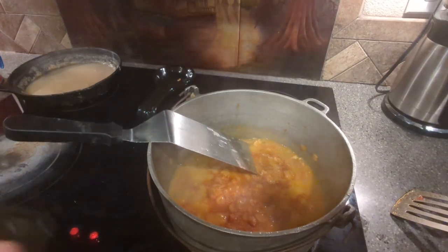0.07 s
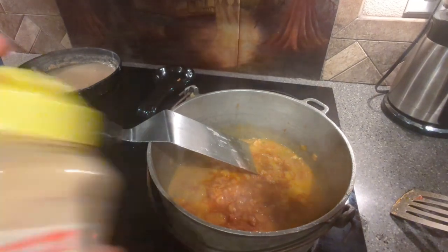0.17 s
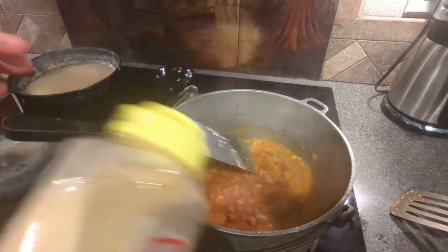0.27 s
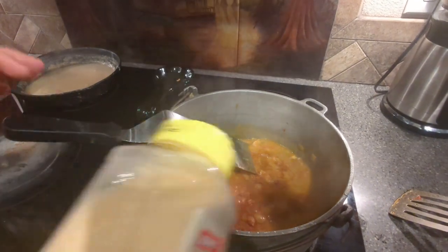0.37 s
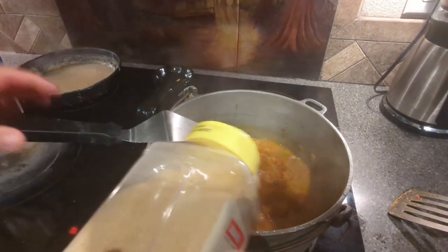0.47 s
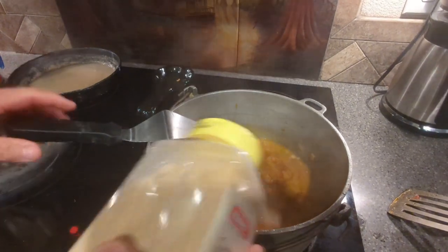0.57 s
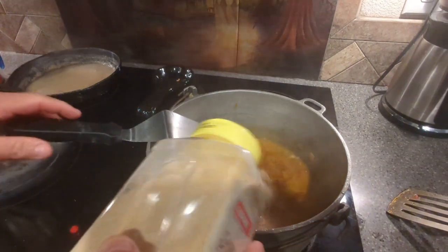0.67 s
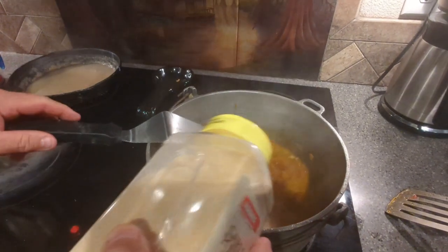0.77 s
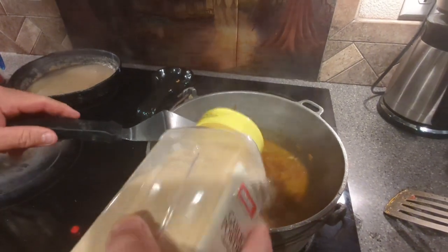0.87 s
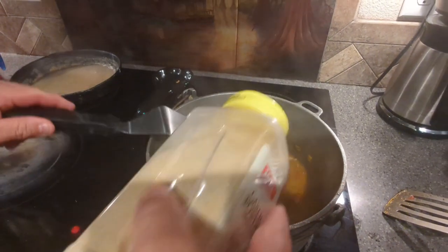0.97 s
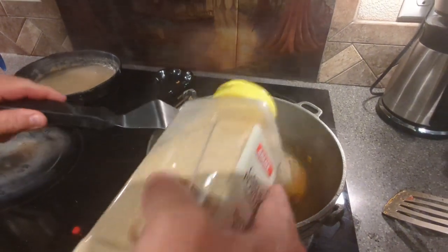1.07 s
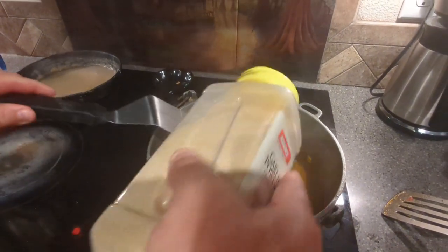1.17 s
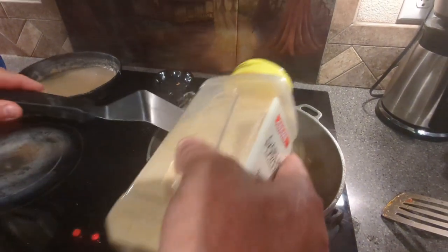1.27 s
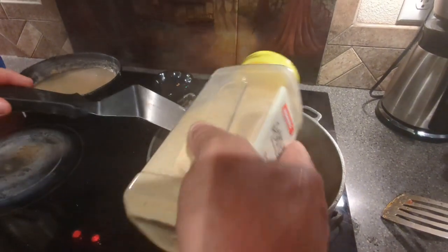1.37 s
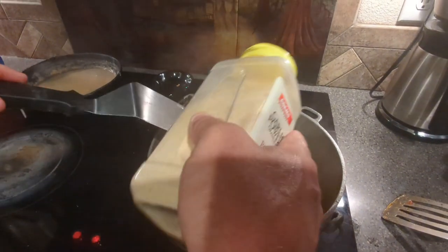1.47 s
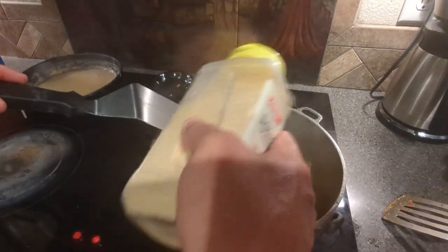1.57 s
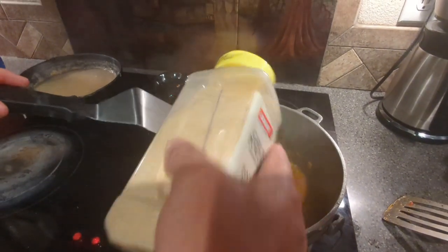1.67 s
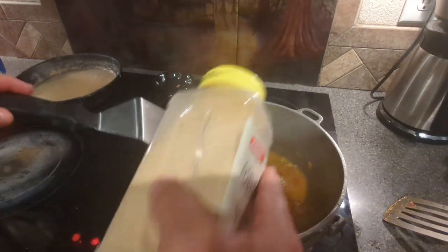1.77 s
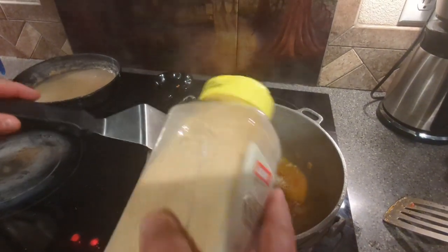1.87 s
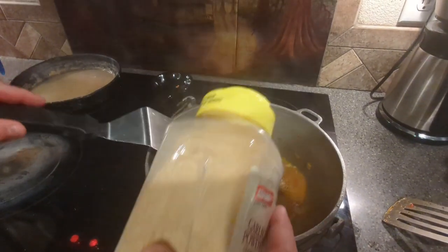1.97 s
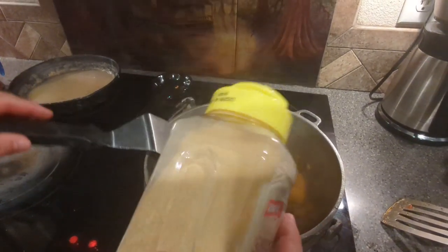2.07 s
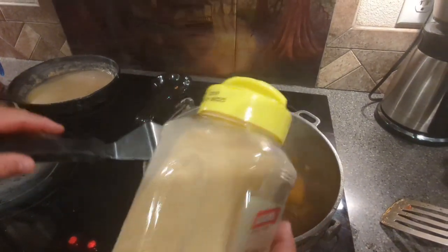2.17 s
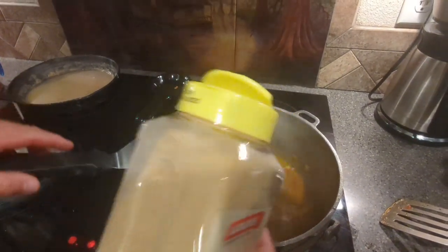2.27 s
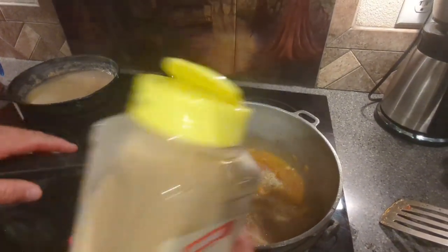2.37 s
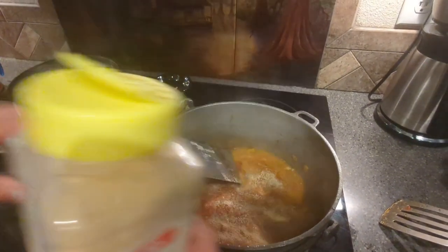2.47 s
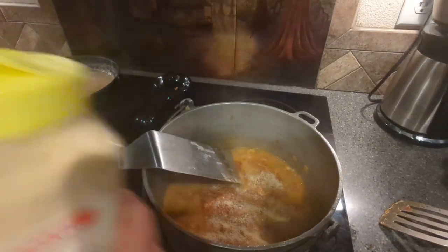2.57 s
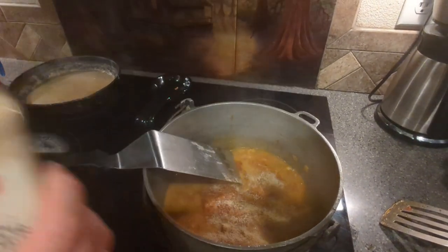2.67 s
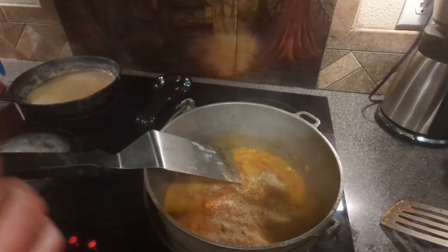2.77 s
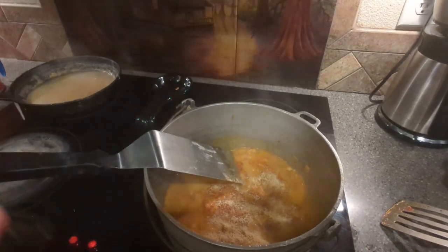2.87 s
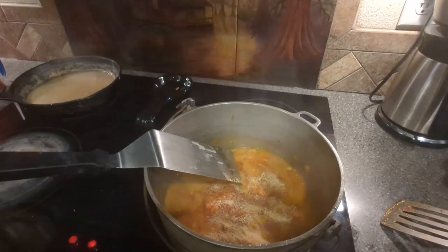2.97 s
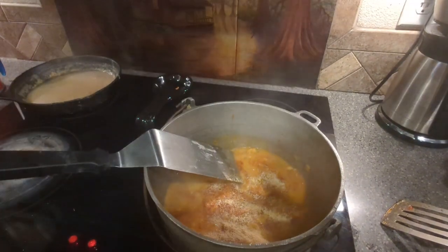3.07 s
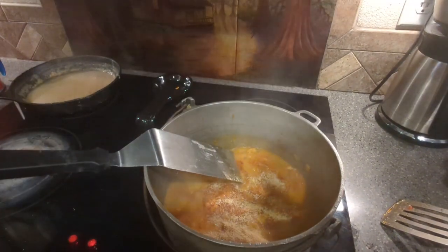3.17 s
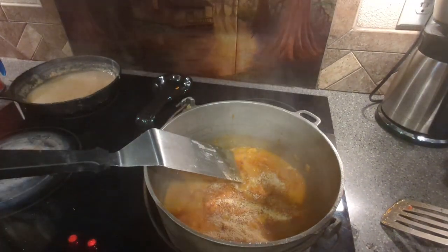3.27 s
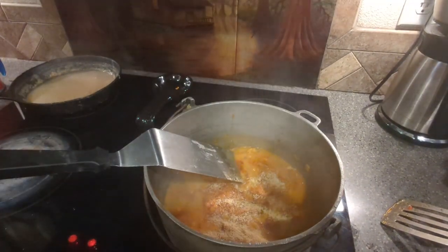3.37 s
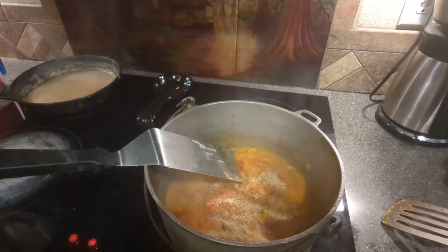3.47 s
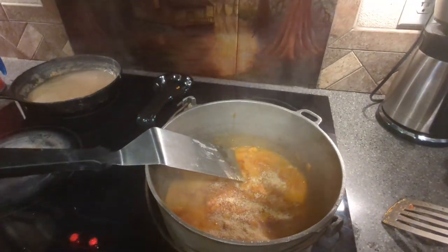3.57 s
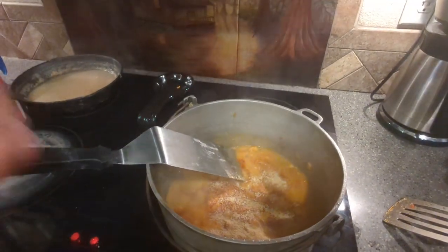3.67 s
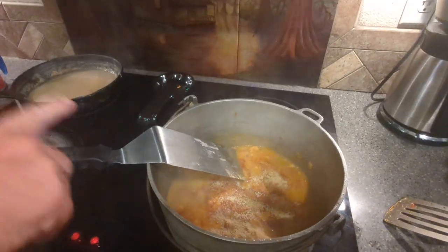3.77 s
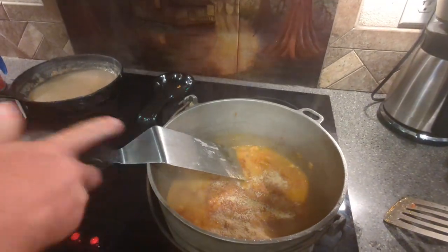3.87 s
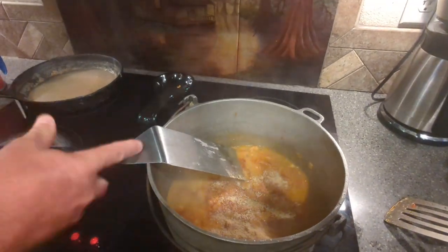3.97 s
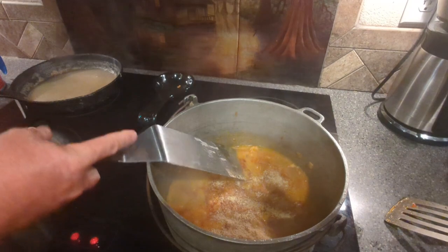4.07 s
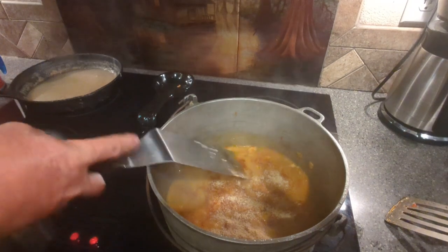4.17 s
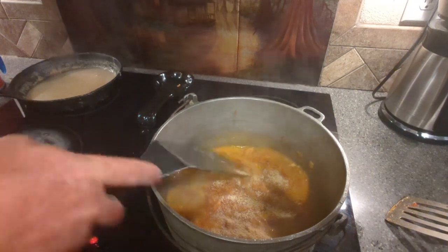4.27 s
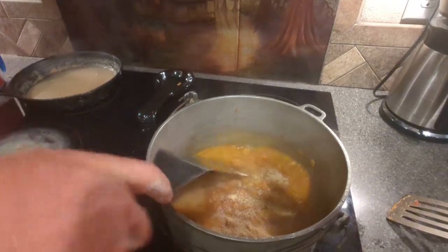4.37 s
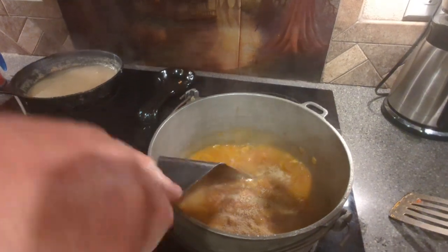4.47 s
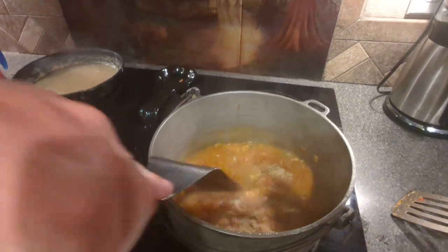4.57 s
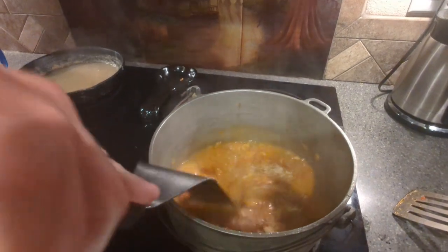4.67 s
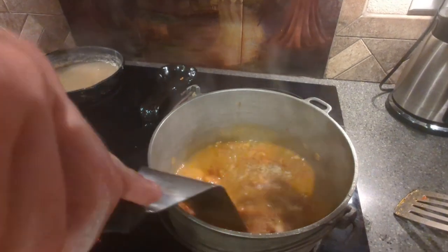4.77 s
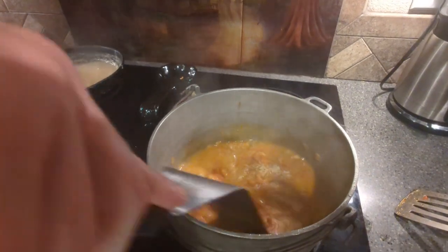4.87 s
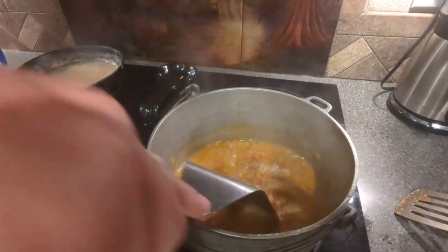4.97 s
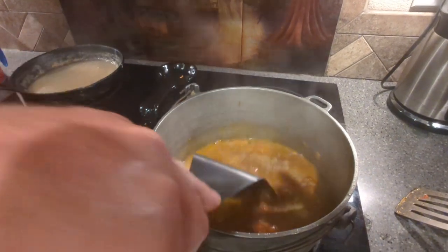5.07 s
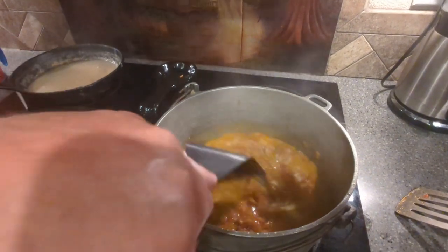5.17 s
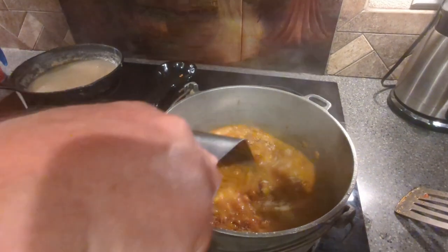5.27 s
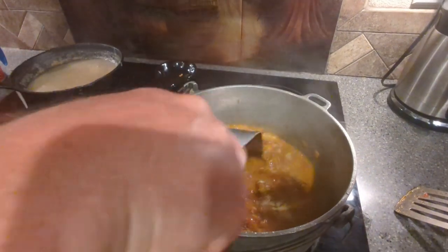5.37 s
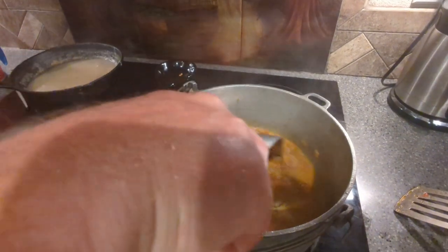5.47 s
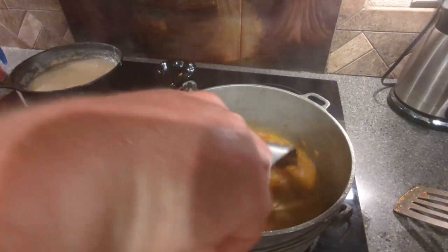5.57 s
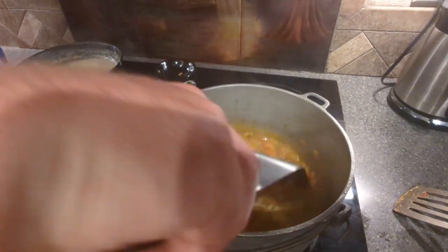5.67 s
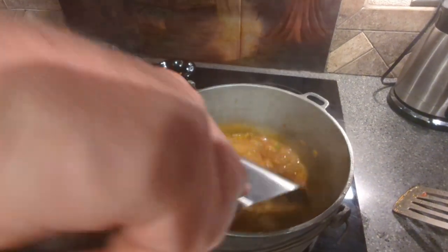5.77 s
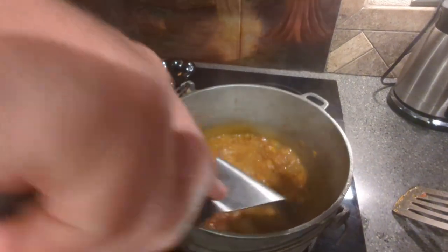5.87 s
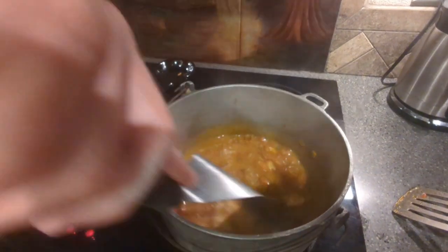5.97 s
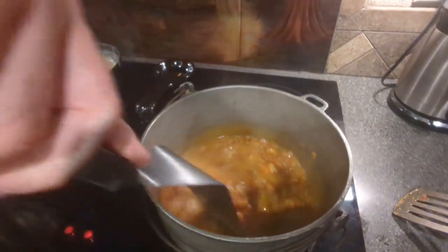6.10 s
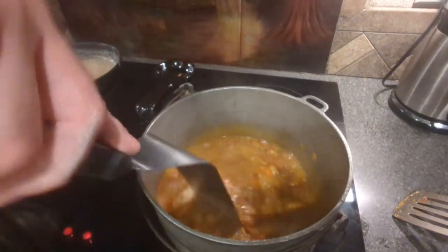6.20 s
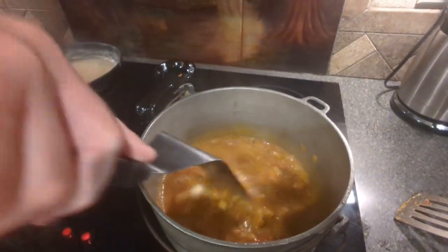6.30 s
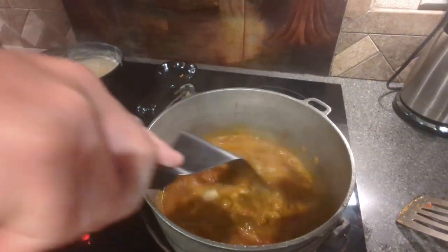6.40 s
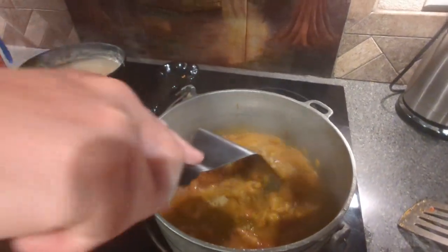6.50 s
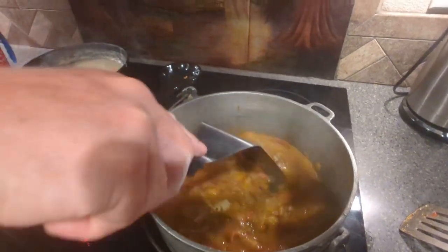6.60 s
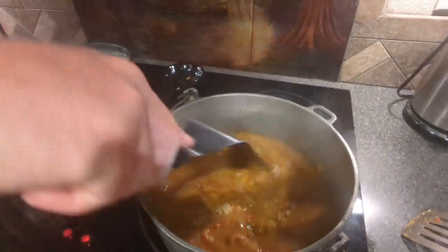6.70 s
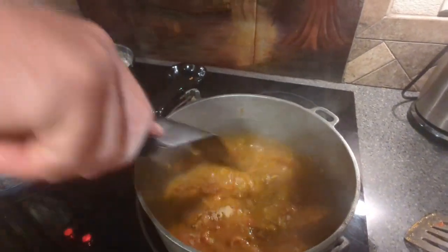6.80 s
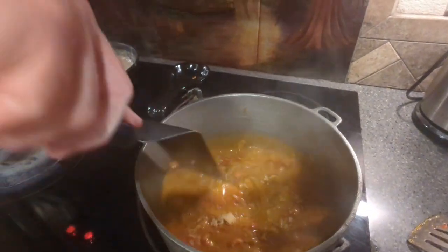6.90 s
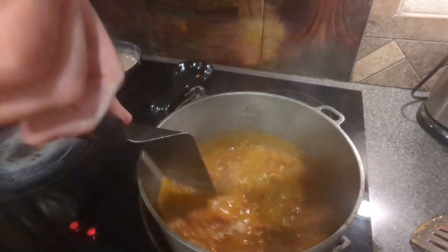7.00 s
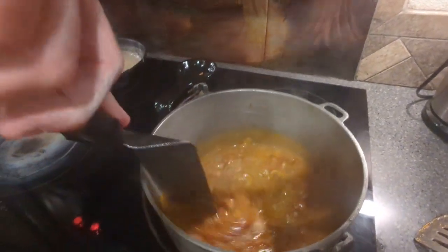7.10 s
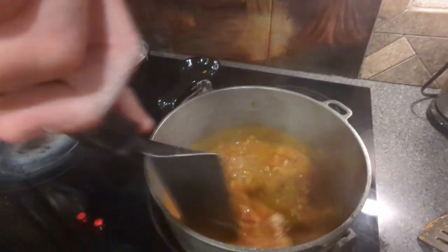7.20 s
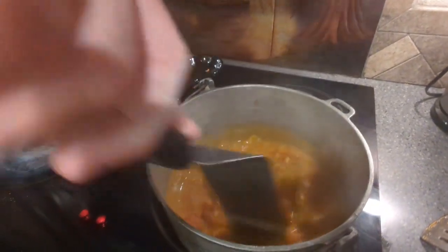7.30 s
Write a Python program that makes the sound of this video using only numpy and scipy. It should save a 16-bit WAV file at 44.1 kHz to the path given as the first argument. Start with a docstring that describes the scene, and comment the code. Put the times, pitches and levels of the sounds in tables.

```python
"""Spatula and spice at the pot

In a kitchen, close to the microphone, a steel spatula rubs and knocks on the rim of an aluminium pot while
spice is shaken in; a plastic lid snaps shut, then the blade scrapes and squeaks on the pot floor under thick
sauce and once chatters. A slow motor drones behind the kitchen hush. Noise slips and blows ring damped modes
for the metal and the lid, filtered noise makes the rustle and air, and wavering sines the squeaks and motor."""
import sys
import numpy as np
from scipy import signal
from scipy.fft import rfft, irfft, next_fast_len
from scipy.io import wavfile
from scipy.ndimage import uniform_filter1d

SR = 44100
rng = np.random.default_rng(int(sys.argv[2]) if len(sys.argv) > 2 else 0)


def inscribe(sig):
    """Save sig as 16-bit PCM at rate SR to the path in sys.argv[1].

    A 1-D sig is mono; a 2-D sig holds one channel per row.
    Samples are clipped to [-1, 1] before scaling.
    """
    pcm = np.round(np.clip(np.atleast_2d(sig).T, -1, 1) * 32767)
    wavfile.write(sys.argv[1], SR, pcm.astype(np.int16))


N = 323694
T = np.arange(N) / SR
EARS = np.array([[.5], [-.5]])  # left, right: half of any difference goes to each


def amp(db):
    """Amplitude factor of a level in dB."""
    return 10 ** (np.asarray(db) / 20)


def unit(x):
    """Scale to an rms of 1."""
    return x / np.sqrt(np.mean(x ** 2))


def peak(x, db):
    """Set the peak of the two-ear mean 3 dB below the given level."""
    return x * amp(db) / np.abs(x.mean(axis=0)).max() / np.sqrt(2)


def along(table, hz):
    """Read a (f/Hz, value) table on a log axis."""
    table_hz, values = np.array(table).T
    return np.interp(np.log(hz + 1), np.log(table_hz + 1), values)


def colour(x, table, share=0.97):
    """Filter by a share of the dB values of a (f/Hz, level/dB) table."""
    n = x.shape[-1]
    hz = np.arange(n // 2 + 1) * SR / n
    return irfft(rfft(x) * amp(share * along(table, hz)), n)


def band(x, lo_hz, hi_hz):
    """Keep the sound between two frequencies."""
    return signal.sosfilt(signal.butter(2, [lo_hz, hi_hz], "band", fs=SR, output="sos"), x)


def walk(rate, size=N):
    """Random levels held 1 / rate s and slewed; spread near 1."""
    step = (np.arange(size) * rate / SR).astype(int)
    held = rng.standard_normal(size // 100)[step]
    return 1.187 * uniform_filter1d(held, int(SR / rate))


def ring(x, modes, gains_db, widen=0.76, alike_hz=970.0, blur_hz=0.):
    """Damped modes, each with its own phase shift between the ears; a wandering phase smears the line."""
    out = 0
    for (hz, width, db), gain_db in zip(modes, gains_db):
        pole = np.exp((2j * hz - width * widen) * np.pi / SR)
        z = signal.lfilter([1 - abs(pole)], [1, -pole], x) * amp(db + gain_db)
        drift = np.cumsum(rng.standard_normal(len(x)) * np.sqrt(2 * np.pi * np.abs(blur_hz) / SR))
        # short waves differ more between the ears
        spread = np.pi * min(hz / alike_hz, 1)
        shift = EARS * spread * rng.choice([-1, 1]) * rng.uniform(0.15, 0.77)
        out = out + (z * np.exp(1j * uniform_filter1d(drift, size=64)) * np.exp(1j * shift)).imag
    return out


def favour(modes, hz, db, octaves):
    """Modes near the given pitch are driven harder."""
    return [db * np.exp(-(np.log2(m[0] / hz) / octaves) ** 2) for m in modes]


def burst(t60, lo_hz, hi_hz, size=9000):
    """A crack of noise that builds within a moment and dies away."""
    t = T[:size]
    onset = 1 - np.exp(-t / 0.00084)
    decay = np.exp(-np.log(1000) * t / t60)
    return band(rng.standard_normal((2, size)) * onset * decay, lo_hz, hi_hz)


def add(out, s, x):
    """Mix x in from time s, cut at the end."""
    i = int(s * SR)
    out[:, i:i + x.shape[1]] += x[:, :N - i]


# level lost over one rise or fall time; how round the flanks are
EDGE_DB, EDGE_SHAPE = -20.5, 1.01


def swells(rows, t):
    """One envelope in dB per row: rise, hold, fall."""
    s, rise, hold, fall = (rows[:, k, None] for k in range(4))
    before = np.maximum((s - t) / np.maximum(rise, .003), 0)
    after = np.maximum((t - s - hold) / np.maximum(fall, .003), 0)
    return EDGE_DB * np.minimum(before + after, 8) ** EDGE_SHAPE


def total(swell_db, level_db):
    """Overlapping events add in power."""
    return np.sqrt(amp(2 * (swell_db + level_db[:, None])).sum(axis=0))


# spectrum of room air and simmer: f/Hz, relative density level/dB
HUSH = [(30, -13), (45, -6.5), (65, 5), (110, -6), (150, -13), (200, -6), (300, -11.5), (750, -26),
        (1700, -30), (5000, -42.5), (9000, -46), (10000, -53.5), (13000, -44), (16000, -54)]
HUSH_DB = -45  # rms


def hush():
    """Room air and simmer: coloured noise, more alike at the two ears in the bass."""
    mid, side = colour(rng.standard_normal((2, N)), HUSH)
    side = colour(side, [(60, -23), (130, -7.5), (290, -12.5), (640, -1.0), (1400, 1.0)])  # f/Hz, level/dB
    return amp(HUSH_DB) * unit(mid + 2 * EARS * side)


SHAFT_HZ = 12.405
# lines of the slow motor: multiple of the shaft rate, mean rms level/dB
DRONE = [(4, -74), (5, -57), (7, -58), (8, -48.5), (9, -41), (10, -48), (11, -59.5), (12, -58.5), (13, -85),
         (15, -52)]


def drone():
    """Multiples of the motor's shaft rate, each wavering a little in level and phase."""
    out = 0
    for multiple, db in DRONE:
        level = amp(db + 0.63 * walk(3.19)) * np.sqrt(2)
        turns = multiple * SHAFT_HZ * T + rng.random() + 0.013 * walk(2.53)
        out = out + level * np.sin(2 * np.pi * turns)
    return out


# spectrum of fine friction: f/Hz, relative density level/dB
HISS = [(880, -43), (1500, -4), (1790, -5.5), (1980, 2), (2410, -8), (2610, 3), (2940, -7.5), (4080, -6.5),
        (4640, -9), (8000, -7.5), (10100, -14), (14300, -6.5), (16000, -17)]


def hiss(surge_db, size=N):
    """Fine friction noise, unrelated at the two ears."""
    noise = colour(rng.standard_normal((2, next_fast_len(size))), HISS)
    return unit(noise)[:, :size] * amp(surge_db * walk(39.86, size=size))


# rustles of hands, jar and sleeves; the row at 3.129 s is the tail of the lid's snap:
# t/s at full level, rise/s, hold/s, fall/s, level/dB;
# dull part and thin top, level/dB re the rustle; left minus right, level/dB
RUSTLE = [(0.0, 0.023, 0.0089, 0.19, -57, 12.5, 8, 0), (0.1, 0.098, 0.021, 0.018, -64, -2, 12, 9),
          (0.182, 0.019, 0.0044, 0.023, -45.5, -10, 5.5, 4), (0.25, 0.06, .15, .1, -61, -5, -5, 0),
          (0.448, 0.0095, 0.00042, 0.047, -57, 5, -13, -3), (0.59, 0.26, .01, .03, -63, 3, -7, -3),
          (0.636, 0.0094, .002, 0.023, -59.5, 11, -5, -2), (0.88, 0.57, .03, .05, -60.5, 1.5, -8, -4),
          (2.4, .05, 0.024, 0.51, -64, 7, 5, 1), (2.588, .03, .002, 0.019, -63, 1, -9, 1),
          (2.695, 0.12, 0.0057, 0.032, -69.5, 6, 10.5, 12), (2.773, 0.014, .002, 0.035, -68, 13, 6.5, -6),
          (2.925, 0.083, 0.043, 0.18, -48.5, -6, 5, 5), (3.129, 0.033, 0.0061, 0.052, -44.5, 11, 6, 0),
          (3.17, .04, 0.023, 0.32, -51.5, 6.5, -12, -1.5), (3.335, 0.1, 0.0042, 0.052, -51.5, -11, 9.5, 5),
          (3.5, 0.42, .005, 0.065, -58.5, -6, 4.5, 3), (3.725, 0.34, .005, .15, -60, -1, -7, 2),
          (3.857, .008, .002, 0.024, -57, 2, -17, 1), (3.921, .008, .002, 0.056, -52, -8, -19, -2)]


def rustle():
    """Hands, jar and sleeves, and the tail of the lid's snap: swells of fine hiss, a dull part and a thin top."""
    rows, slow = np.array(RUSTLE), T[::32]
    db, dull_db, thin_db, pan_db = rows[:, 4:].T
    swell = swells(rows, slow)

    def gain(part_db):
        """Level of one part at each ear."""
        return np.array([np.interp(T, slow, total(swell, db + part_db + ear * pan_db)) for ear in EARS])

    fine = hiss(4.6)
    dull = unit(band(rng.standard_normal((2, N)), 900, 3000)) * amp(2.5 * walk(40))
    thin = unit(band(fine, 7760, 15700))
    return gain(0) * unit(band(fine, 3660, 9900)) + gain(dull_db) * dull + gain(thin_db) * thin


# faint ticks: t/s, level/dB as in peak(), f/Hz, left minus right level/dB
TICKS = [(0.219, -43, 1920, -7), (0.2802, -36, 1060, -7), (0.546, -45, 1990, -6), (0.571, -44.5, 2150, -5),
         (0.8589, -45.5, 1850, -11), (2.828, -40.5, 1900, -1), (2.8818, -35.5, 1920, -3),
         (3.492, -44, 1760, -11), (3.8127, -51, 1730, -7)]


def ticks():
    """Faint ticks: short bursts of noise in a narrow band around each pitch."""
    out = np.zeros((2, N))
    for s, db, hz, pan_db in TICKS:
        add(out, s, amp(EARS * pan_db) * peak(burst(0.017, hz * 0.89, hz * 1.31), db))
    return out


# share of the pressure swing, in dB, that each layer follows
BOOM_FOLLOWS, UPPER_FOLLOWS, HISS_FOLLOWS = 0.8, 1, 0.73


def grit(spread_db, surge_db, size):
    """Dense micro-slips of uneven but bounded size that come in quick surges."""
    uneven_db = spread_db * np.minimum(rng.exponential(size=size), 4.0)
    return rng.standard_normal(size) * amp(uneven_db + surge_db * walk(70, size=size))


def driven(slips, modes, gains_db, roam_db, blur_hz):
    """A group of modes at even loudness; the contact point wanders, so each is driven now more, now less."""
    gains_db = [g + roam_db * walk(14, size=len(slips)) for g in gains_db]
    power = sum(m[1] * amp(2 * (m[2] + g)) for m, g in zip(modes, gains_db))
    rings = ring(slips, modes, gains_db, blur_hz=blur_hz)
    rings = band(rings, 0.91 * modes[0][0], 1.47 * modes[-1][0])
    return unit(rings / np.sqrt(power))


def friction(table, blur, low, modes, grit_db, surge_db, roam_db, focus_db, octaves, thrum_db, treble_db):
    """Slips drive groups of modes and shake the hob; where the edge bears decides their shares."""
    rows = np.array(table)
    span = slice(int((rows[0, 0] - .2) * SR), int((rows[-1, 0] + .3) * SR))
    press = swells(rows, T[span])
    db, boom_db, second_db, upper_db, hiss_db = rows[:, 4:9].T
    # the strongest stroke sets the place
    weight = amp(2 * (press + db[:, None]))
    boom_hz, ring_hz, upper_hz = rows[:, 9:].T @ weight / weight.sum(axis=0)
    size = press.shape[1]
    blur_hz = np.interp(T[span], *np.array(blur).T)
    slips = grit(grit_db, surge_db, size=size)
    edges_hz = [(0, 1300), (1300, 1800), (1800, 4100), (4100, 10000)]
    mid, second, upper, high = ([m for m in modes if a < m[0] < b] for a, b in edges_hz)
    boom = driven(slips, low, favour(low, boom_hz, focus_db, 1.4 * octaves), roam_db, 0.3 * blur_hz)
    main = driven(slips, mid, favour(mid, ring_hz, focus_db, 0.52 * octaves), roam_db, blur_hz)
    over = driven(slips, second, [0] * len(second), roam_db, blur_hz)
    top = driven(slips, upper, favour(upper, upper_hz, focus_db, octaves), roam_db, 1.55 * blur_hz)
    # narrow high resonances, mixed into the hiss
    treble = driven(slips, high, [0] * len(high), 3.4 * roam_db, 1.3 * blur_hz)
    thrum = unit(band(slips, 138.3, 158))  # the hob
    low_part = boom + amp(thrum_db) * thrum
    hiss_part = hiss(2.13, size=size) + amp(treble_db) * treble
    out = np.zeros((2, N))
    out[:, span] = (total(press, db) * main
                    + total(UPPER_FOLLOWS * press, db + second_db) * over
                    + total(UPPER_FOLLOWS * press, db + upper_db) * top
                    + total(BOOM_FOLLOWS * press, db + boom_db) * low_part
                    + total(HISS_FOLLOWS * press, db + hiss_db) * hiss_part)
    return out


# strokes on the bare rim: t/s at full pressure, rise/s, hold/s, fall/s, ring level/dB;
# low boom, second ring, upper modes, hiss, level/dB re ring; favoured boom, ring, upper mode, f/Hz
RUB = [(0.93, 0.058, 0.073, 0.054, -51, 0.5, -7, -0.5, -12, 276, 1125, 2700),
       (1.045, 0.13, 0.056, 0.023, -43, -7, -8, -3.5, -2.5, 274, 1150, 3260),
       (1.11, 0.023, 0.0084, 0.041, -45.5, -5, -14, 6.5, -6, 240, 970, 3200),
       (1.189, 0.068, 0.0045, 0.082, -46, -11, -3.5, -3, -9.5, 292, 1160, 3150),
       (1.31, 0.011, 0.028, .03, -47, -20, 0, 1, -6, 260, 990, 2670),
       (1.365, 0.045, 0.052, 0.065, -34, -18.5, -8.5, -7, -11, 308, 1000, 2600),
       (1.43, .03, 0.031, 0.18, -47.5, -14, -6, -3, -8, 322, 1050, 2230),
       (1.655, 0.023, 0.063, 0.055, -42, -22, -13, -5.5, -8, 363, 1017, 2160),
       (1.72, 0.062, 0.03, 0.039, -40, -16, -8, -8, -7, 366, 1014, 2630),
       (1.78, 0.039, 0.021, 0.068, -28, -17, -8.5, -3, -7, 413, 980, 1920),
       (1.82, 0.05, 0.011, 0.15, -29, -16, -6.5, -4, -5.5, 424, 1100, 2140),
       (1.93, 0.038, 0.078, 0.19, -48.5, 4, -4, -1, -11, 420, 1010, 2330),
       (2.067, 0.16, 0.059, 0.19, -44.5, -8, -20, -8.5, -9, 537, 1140, 2510),
       (2.13, 0.08, 0.04, 0.1, -38.5, -6, -4.5, -12, -11, 490, 935, 2260),
       (2.2, 0.074, 0.045, 0.076, -37, -10, -4, -6, -9, 480, 930, 2110),
       (2.27, 0.048, 0.062, 0.043, -38, 0, -7, -2, -5, 275, 925, 2140)]
# smear of the lines as the blade wobbles, before each group's factor: t/s, f/Hz
RIM_BLUR = [(.9, 6), (1.25, 5.5), (1.35, 2), (1.6, 2.2), (1.88, 7.9), (1.95, 54), (2.4, 51)]
# modes of the side wall, then of the bare rim: f/Hz, width/Hz before the damping factor, level/dB
WALL_MODES = [(280.7, 24, -8), (328, 28, -6), (390, 13, -5), (475, 40, -8.5), (554, 61, -10.5)]
RIM_MODES = [(745.4, 7.6, 1), (927, 28, -11), (962, 23, -4.5), (999, 20, -1), (1090, 59, -3), (1128, 13, 0),
             (1233, 30, -7.5), (1487, 16, -8), (1539, 106, -4.5), (1680, 68, -14), (1910, 53, -3),
             (2110, 25, -14), (2248, 16, 3), (2647, 15, -1), (3000, 40, -10), (3217, 29, 0),
             (3430, 28, -8.5), (3624, 60, -4), (3700, 51, -13), (4000, 25, -13), (4240, 66, -6),
             (4370, 41, -13), (4800, 49, -16), (5150, 27, -1), (5600, 30, -18), (6100, 33, -3),
             (6400, 85, -4), (6800, 40, -5), (7420, 60, -9), (8000, 60, -8), (8500, 100, -8),
             (9300, 50, -8)]


def rub():
    """The dry rim rings in narrow lines."""
    return friction(RUB, RIM_BLUR, WALL_MODES, RIM_MODES, grit_db=1.5, surge_db=1.65, roam_db=1.36,
                    focus_db=9.2, octaves=0.079, thrum_db=-4, treble_db=-6.0)


# the blade locks onto one mode and sings: t/s at full level, rise/s, hold/s, fall/s, rms level/dB, f/Hz
SQUEAKS = [(0.95, .04, .06, .06, -60, 2653), (1.05, .05, 0.033, .05, -48, 3400),
           (1.2, .03, .015, .04, -56, 3400), (1.37, .03, .03, .05, -49, 2644),
           (1.375, .03, 0.018, 0.042, -37, 985), (1.43, .025, 0.035, .11, -44, 2263),
           (1.772, .03, 0.022, .05, -42, 1918), (1.79, 0.043, 0.046, .03, -46, 5125),
           (1.798, .05, 0.033, .04, -35, 992), (4.645, .015, 0.033, .03, -42.5, 1142),
           (5.227, .02, .012, .04, -38, 2430), (5.65, .04, .03, .04, -36.5, 1170),
           (6.49, .04, 0.029, 0.035, -40, 2400), (6.795, .03, .04, .06, -36, 1090),
           (6.86, 0.051, 0.048, .08, -36.5, 1008)]


def squeaks(waver=0.29, flutter_db=1.5):
    """Near-steady tones that waver a little, each with its own phase shift between the ears."""
    out = np.zeros((2, N))
    t = T[:22050]
    for row in SQUEAKS:
        start, db, hz = row[0] - .15, row[4], row[5]
        wander = waver * np.pi * walk(44.5, size=len(t))
        phase = 2 * np.pi * hz * t + wander + EARS * rng.uniform(-2.5, 2)
        level_db = swells(np.array([row]), start + t) + db + flutter_db * walk(55, size=len(t))
        add(out, start, np.sqrt(2) * amp(level_db) * np.sin(phase))
    return out


# spatula on pot: t/s, ring level/dB and crack level/dB as in peak(), brightness/dB per octave
KNOCKS = [(1.089, -9.5, -25, -3.5), (1.303, -26.5, -40, -2), (1.343, -30, -34, 7), (1.88, 0, -6.5, -7),
          (1.887, -7.5, -29, -10), (1.896, -14, -18, -2), (1.913, -12, -27, -16.5), (2.314, -22, -19.5, -1),
          (2.329, -18, -28, -5.5), (3.995, -18, -40, -19), (4.001, -26, -49, -8), (4.134, -34, -50, 9),
          (4.19, -24, -26.5, 2.5), (4.202, -16, -27, -2), (4.293, -27.5, -47, -7), (4.407, -24, -54, -4),
          (4.491, -28.5, -42, -2), (4.634, -28.5, -41, -4), (4.786, -35, -39, -0.6), (5.18, -25, -46, -2),
          (5.207, -29, -44, -2), (5.313, -12, -21.5, -12), (5.322, -14, -42, -7),
          (5.332, -10.5, -33, -10.5), (5.467, -33, -49, -10), (5.555, -9.5, -30, -4),
          (5.624, -14, -33, -15), (5.828, -20.5, -45, -10), (6.221, -21.5, -40, -19),
          (6.681, -16.5, -27.5, -0.5), (6.694, -11, -46, -9.5), (6.746, -23, -36, -3)]
KNOCK_T60_S, CONTACT_S = 0.034, 0.00089  # choking of the loud ring; time constant of its onset


def knocks():
    """Each blow: a short push into the pot modes and a bright crack."""
    out, t = np.zeros((2, N)), T[:9000]
    for s, db, crack_db, tilt_db in KNOCKS:
        bare = s < 3  # later the pot floor lies under sauce, which draws the push out
        pot_modes = RIM_MODES + WALL_MODES if bare else WET_MODES + BOOM_MODES
        modes = [m for m in pot_modes if m[0] < 4100]
        push = rng.standard_normal(len(t)) * np.exp(-t / (0.0009 if bare else 0.0035))
        # a softer contact starves the upper modes
        gains_db = tilt_db * np.log2(np.array(modes)[:, 0] / 1000) + 3.0 * rng.standard_normal(len(modes))
        body = band(ring(push, modes, gains_db, widen=0.77), 756, 7300)
        # the hand on the handle chokes the first loud ring, a weak tail stays
        choke = np.exp(-np.log(1000) * t / KNOCK_T60_S) + 0.14
        body *= choke * (1 - np.exp(-t / CONTACT_S))
        add(out, s, peak(body, db) + peak(burst(0.036, 1900, 13800), crack_db))
    return out


# the pot rocks on the hob: t/s, level/dB as in peak(), favoured mode f/Hz
THUDS = [(1.099, -25, 149.3), (1.885, -24, 145), (1.898, -20.5, 83.5), (2.314, -27, 146),
         (2.332, -24.5, 74), (3.994, -15.5, 206), (4.0, -12.5, 121), (4.02, -14, 55.2),
         (4.225, -19.5, 91.3), (5.314, -20.5, 81), (5.361, -23, 138.7), (5.555, -16, 138.5),
         (5.627, -19, 150.5), (6.29, -24, 143), (6.685, -21.5, 149.3), (6.739, -24, 149.3)]
# modes of the hob: f/Hz, width/Hz before the damping factor, level/dB
HOB_MODES = [(51.9, 13, 2.9), (73, 24, 1), (86.7, 10, 1), (121.2, 18, 11), (145, 10.3, 1), (199, 41, 2.85),
             (282, 40, 11)]
THUD_DAMPING = 1.17  # factor on the widths


def thuds():
    """The heavier blows thud through the hob: a smooth shove into its low modes."""
    out, t = np.zeros((2, N)), T[:9000]
    shove = np.exp(-((t - .002) / 0.0015) ** 2)
    for s, db, hz in THUDS:
        gains_db = favour(HOB_MODES, hz, 28.0, 0.081)
        thud = ring(shove, HOB_MODES, gains_db, widen=THUD_DAMPING, alike_hz=9000.)
        swung = thud * (1 - np.exp(-t / 0.0058))  # the hob takes a moment to swing
        add(out, s, peak(band(swung, 44, 760), db))
    return out


# the plastic jar and its lid: t/s, body level/dB and crack level/dB as in peak(), left minus right level/dB
LID = [(2.941, -20, -21.5, 5), (2.96, -30, -35, -4), (2.982, -38, -27, 2), (3.098, -24, -30, 10),
       (3.102, -6, -6, 5.5)]
# modes of the lid: f/Hz, width/Hz before the damping factor, level/dB
LID_MODES = [(299, 60, 4.5), (567, 100, 0.5), (786, 340, -2), (1430, 400, -2.5), (1850, 310, -3),
             (2360, 710, -3), (3260, 220, -3.5), (3860, 360, -5)]
# spectrum of the crack: f/Hz, relative density level/dB
SNAP = [(1470, -40), (2500, -9), (2850, -6), (3280, 1.5), (4270, -20), (6300, -4.5), (7420, -10),
        (11900, -10.5), (16000, -14)]


def lid():
    """The plastic lid: a burst rings its broad modes under a very short bright crack."""
    out, t = np.zeros((2, N)), T[:9000]
    for s, db, crack_db, pan_db in LID:
        body = ring(burst(0.029, 230, 9800)[0], LID_MODES, np.zeros(len(LID_MODES)))
        noise = colour(rng.standard_normal((2, 9000)), SNAP)
        crack = band(noise * np.exp(-t / 0.0031) * (1 - np.exp(-t / 0.00043)), 3100, 15000)
        add(out, s, amp(EARS * pan_db) * (peak(body, db) + peak(crack, crack_db)))
    return out


# strokes under the sauce: t/s at full pressure, rise/s, hold/s, fall/s, ring level/dB;
# low boom, second ring, upper modes, hiss, level/dB re ring; favoured boom, ring, upper mode, f/Hz
SCRAPE = [(4.01, 0.015, 0.05, 0.087, -57.5, 10.5, -3, 1.5, -17, 347, 1030, 2080),
          (4.138, 0.021, 0.0045, 0.058, -46.5, 1, -9, -0.5, -4, 373, 950, 2300),
          (4.215, 0.049, 0.0082, 0.13, -42.5, -3.5, -9, -6, -7.5, 380, 1030, 2250),
          (4.31, 0.048, .01, 0.056, -53, -15, -12, -8, -7, 300, 1050, 2250),
          (4.42, 0.013, 0.012, 0.062, -64, 3, -8, -4, 10.5, 397, 1020, 2280),
          (4.497, 0.011, 0.0044, 0.061, -42, -2, -0.5, -7, -7, 450, 1050, 2030),
          (4.565, 0.052, .005, 0.033, -41, -6.5, 2, 2, 0, 430, 1200, 2470),
          (4.64, 0.027, 0.012, 0.075, -40, -10, -5, -2.5, -3.5, 394, 1150, 2240),
          (4.8, 0.13, 0.027, 0.096, -55, 6, 0, 6.5, 4, 458, 1170, 2560),
          (4.93, 0.072, 0.025, 0.093, -40.5, 1.5, 6.5, 0, -6, 486, 1100, 2400),
          (4.975, 0.058, 0.027, 0.11, -31, -1, 0.5, 3, -2, 594, 1090, 2180),
          (5.1, 0.13, 0.0049, 0.081, -34, -8.5, -4, -3, -2, 390, 1016, 2270),
          (5.185, 0.076, 0.025, 0.053, -40.5, -11, 3.5, 1, -5, 390, 1060, 2020),
          (5.232, 0.048, 0.0086, 0.13, -42.5, -7, -2, 1, 0, 390, 1070, 2530),
          (5.34, 0.053, 0.0074, 0.044, -36.5, 1, -3, -30, -11, 594, 1040, 2120),
          (5.388, 0.041, 0.0046, 0.056, -40.5, 3, -12, -23, -17, 490, 1100, 2170),
          (5.475, 0.064, 0.049, 0.071, -44, -7, 0.5, -9, -8, 380, 1010, 2180),
          (5.575, 0.06, 0.0048, 0.033, -36.5, -0.5, -16, -15, -10, 360, 1220, 2030),
          (5.63, 0.058, 0.087, 0.04, -32, -4.5, -6.5, -11, -13, 475, 1160, 2100),
          (5.732, 0.02, 0.012, 0.033, -36, 0, 1.5, -3.5, -6, 480, 1000, 2320),
          (5.84, 0.64, 0.043, 0.093, -47, 2.5, -2, -1, 0, 460, 1180, 2140),
          (5.94, 0.04, 0.033, 0.068, -42, -1, -1.5, -10, -3, 487, 970, 2273),
          (6.03, 0.1, 0.095, 0.085, -36.5, 0.5, 2, 0.5, 1, 402, 1136, 2210),
          (6.29, 0.079, 0.021, 0.09, -31, 5, 3, 5, 0.5, 482, 1210, 2045),
          (6.35, 0.072, 0.0054, 0.087, -24.5, -2, -7.5, -3.5, -5, 630, 1170, 2280),
          (6.44, 0.018, 0.029, 0.08, -36.5, -4, -5, -1.5, -3.5, 378, 1130, 2160),
          (6.5, 0.11, 0.0068, 0.17, -42, 0.5, 3, 3, -2, 364, 1100, 2400),
          (6.705, 0.095, 0.0026, 0.022, -41, 4.5, -14, -18, -3.5, 610, 1030, 2140),
          (6.75, 0.02, 0.046, 0.077, -31, -11, -6, -17, -15, 397, 1056, 2140),
          (6.81, 0.057, 0.056, 0.17, -26, -1.5, -14, -13, -13, 574, 1040, 2270),
          (6.89, 0.1, .12, 0.29, -28.5, -3, -6, -6.5, -6.5, 507, 1030, 2570),
          (7.087, 0.15, 0.043, 0.19, -33.5, -2.5, -2, -3.5, -1, 464, 1030, 2550),
          (7.245, 0.083, .005, 0.12, -32.5, 7, 2.5, -4.5, -4.5, 499, 1201, 2188),
          (7.325, 0.11, 0.038, 0.064, -30.5, 5, -1.5, -4, -6, 397, 1170, 2038)]
# smear of the lines as the blade wobbles, before each group's factor: t/s, f/Hz
WET_BLUR = [(4.0, 11), (4.75, 15.4), (4.9, 48), (5.5, 34.3), (6.1, 50), (6.65, 41.5), (6.78, 7.2),
            (7.3, 8.3)]
# modes of the floor's boom, then of the sauce-covered floor: f/Hz, width/Hz before the damping factor, level/dB
BOOM_MODES = [(304, 26, -21), (395, 40, -4.5), (441, 20, -1), (458, 86, 1.5), (577, 7.5, -12),
              (639, 123, -2.5)]
WET_MODES = [(776, 154, -6), (995, 17, -5.5), (1008.5, 54, 7), (1106, 60, 5.5), (1165, 17, 1),
             (1445, 140, -2.5), (1608, 75, -3), (1645, 26, -9), (1718, 48, -4), (1950, 77, -5),
             (2136, 55, -10.5), (2335, 87, -11.5), (2438, 50, -12), (2658, 58, -8.5), (2960, 120, -16.5),
             (3218, 91, -7.5), (3500, 80, -14), (3750, 90, -15), (3930, 40, -14), (4394, 40, -5),
             (5044, 31, -6.5), (5800, 79, -15.5), (6680, 62, -4), (7160, 76, -26), (7960, 140, -11.5),
             (8920, 120, -14.5)]


def scrape():
    """Sauce damps the floor of the pot: broad rings over a boom."""
    return friction(SCRAPE, WET_BLUR, BOOM_MODES, WET_MODES, grit_db=2.65, surge_db=1.26, roam_db=3.0,
                    focus_db=9.0, octaves=0.091, thrum_db=-15.5, treble_db=-12.5)


# the blade judders on the pot floor: t/s, mean slip rate f/Hz, level/dB
CHATTER = [(6.23, 344, -47), (6.243, 349, -42), (6.29, 317.2, -18), (6.364, 320.4, -23),
           (6.392, 335.3, -49), (6.41, 334.3, -60)]


def chatter(jitter=0.0626, scatter_db=7.0):
    """Nearly regular stick-slip pulses into the low modes."""
    s, hz, db = np.array(CHATTER).T
    rate_hz = np.interp(T, s, hz) * (1 + jitter * walk(150))
    pulses = np.diff(np.floor(np.cumsum(rate_hz) / SR), prepend=0)
    slips = pulses * amp(scatter_db * walk(200))
    modes = [(328, 24, 5.0), (606, 68, 7.5), (1140, 210, -2.5)]  # columns as in the pot modes
    gain = amp(np.interp(T, s, db, left=-120, right=-120))
    return gain * unit(band(ring(slips, modes, [0] * 3), 210, 2500))


# the pot side of the head: f/Hz, left minus right level/dB
SHADOW = [(60, -8), (110, -0.5), (200, 1), (380, -0.5), (700, -2.5), (1290, -7.5), (2380, -5), (4400, 3),
          (8120, -2.5), (15000, 3.5)]
ROOM_T60_S, ROOM_DB = 0.13, -12.5


def scene():
    """Pot and jar close by with a short room echo; motor and hush behind them."""
    pot = rub() + scrape() + squeaks() + chatter() + knocks() + thuds()
    pot = np.array([colour(pot[0], SHADOW, .5), colour(pot[1], SHADOW, -.5)])
    near = pot + rustle() + ticks() + lid()
    echo = unit(burst(ROOM_T60_S, 160, 6500, size=20000)) / np.sqrt(20000)
    late = np.pad(echo, ((0, 0), (200, 0)))  # the echo starts 200 samples late
    room = signal.fftconvolve(near.mean(axis=0)[None], late, axes=1)[:, :N]
    return near + amp(ROOM_DB) * room + drone() + hush()


TOP_HZ = 16000


def record(dry):
    """The microphone rounds the loudest peaks and drops the deepest bass; the top is cut steeply."""
    rounded = np.tanh(dry)
    lean = signal.sosfilt(signal.butter(5, 38, "high", fs=SR, output="sos"), rounded)
    return signal.sosfilt(signal.ellip(10, .5, 65, TOP_HZ, fs=SR, output="sos"), lean)


dry = scene()
out = record(dry)
inscribe(out)
```